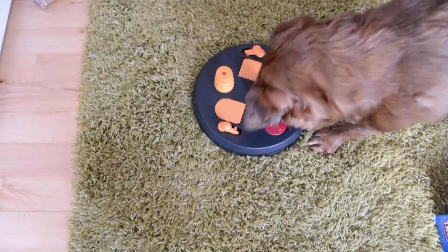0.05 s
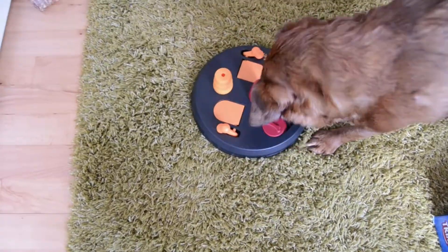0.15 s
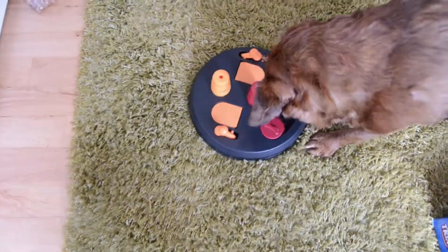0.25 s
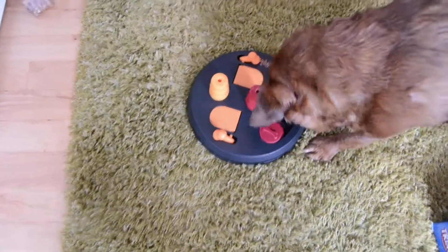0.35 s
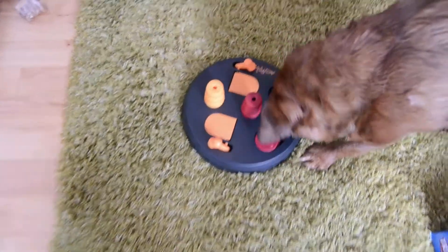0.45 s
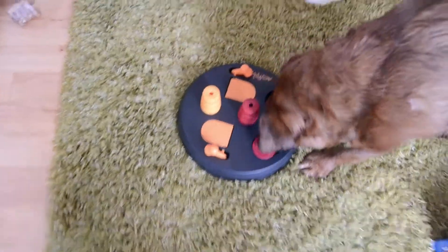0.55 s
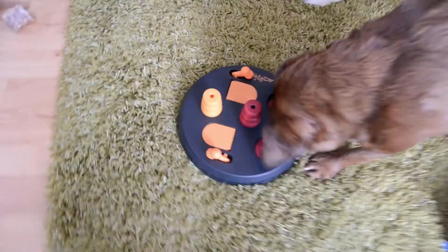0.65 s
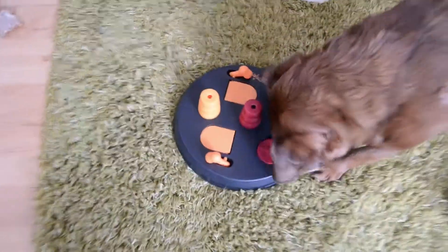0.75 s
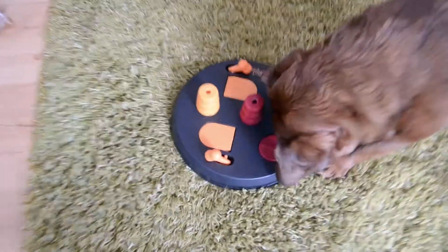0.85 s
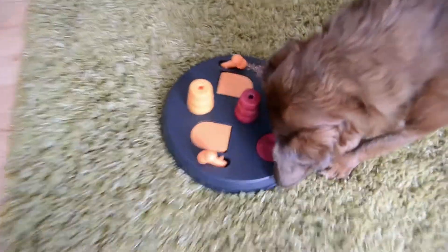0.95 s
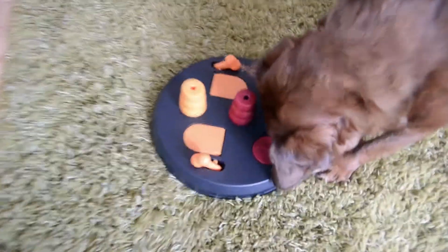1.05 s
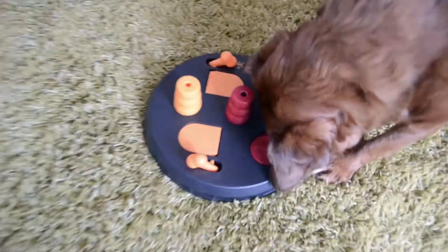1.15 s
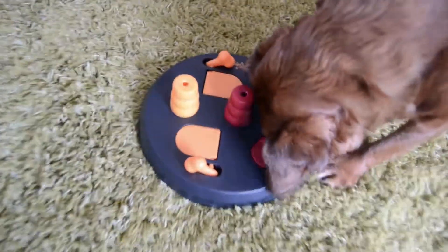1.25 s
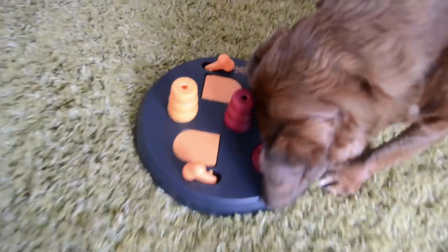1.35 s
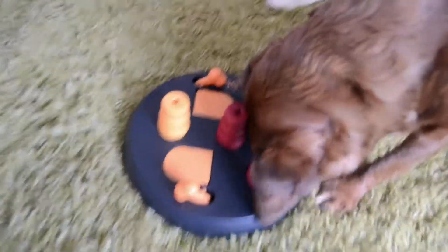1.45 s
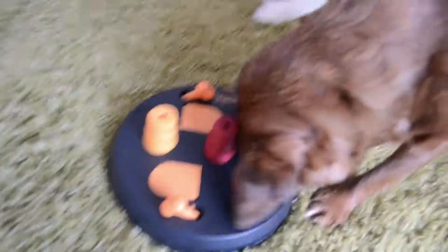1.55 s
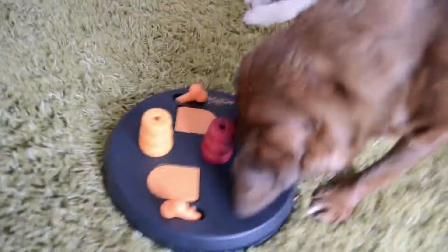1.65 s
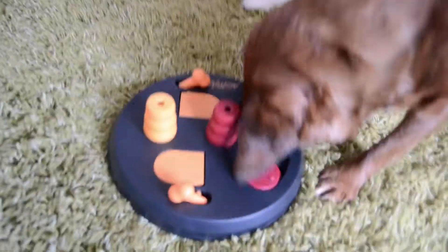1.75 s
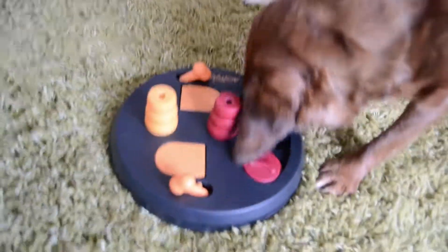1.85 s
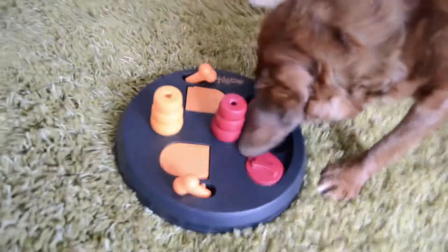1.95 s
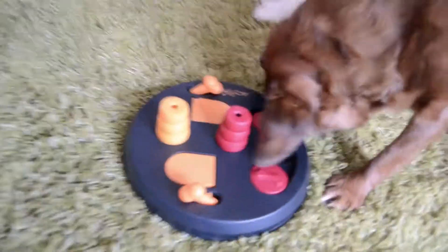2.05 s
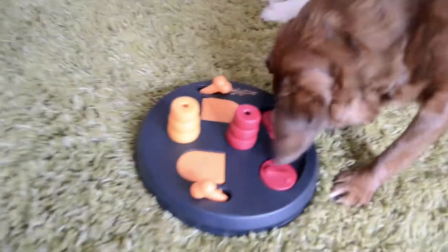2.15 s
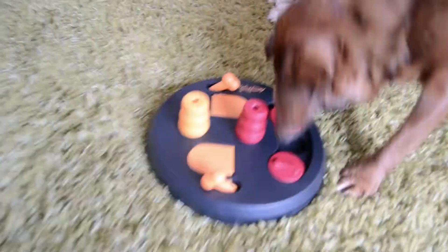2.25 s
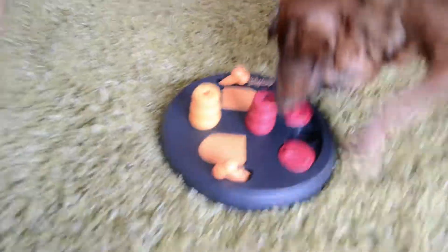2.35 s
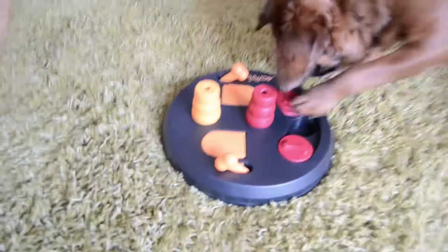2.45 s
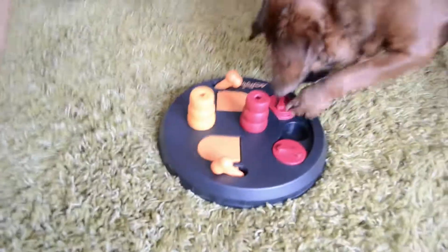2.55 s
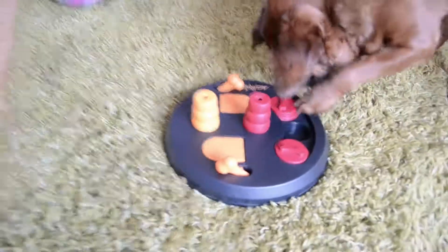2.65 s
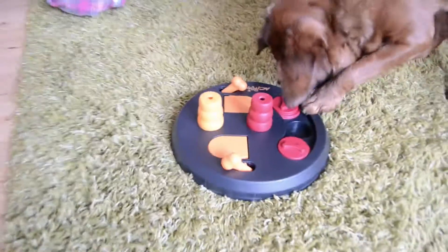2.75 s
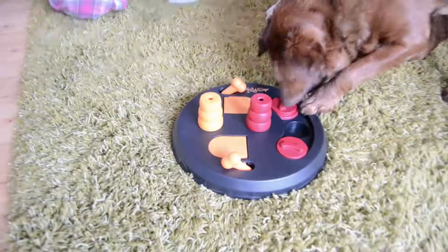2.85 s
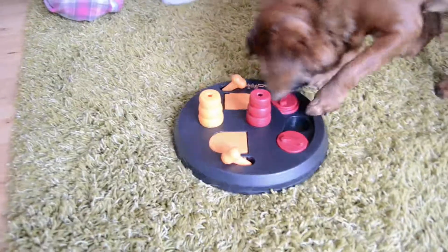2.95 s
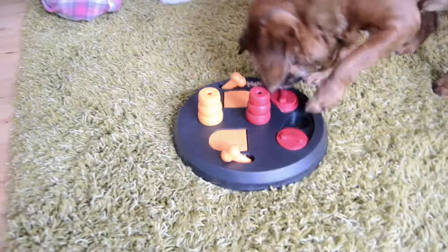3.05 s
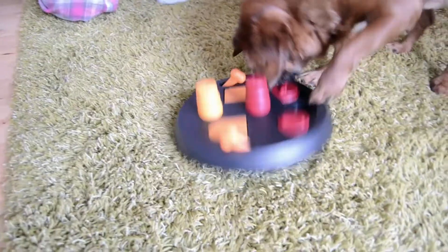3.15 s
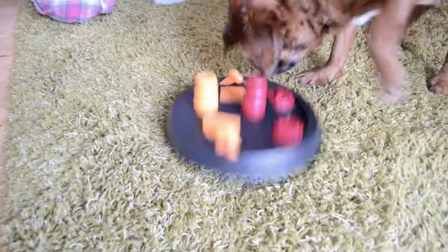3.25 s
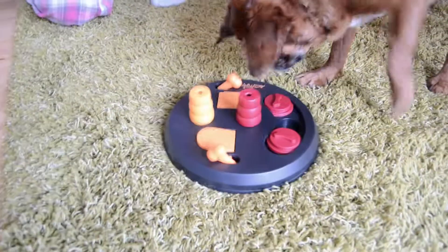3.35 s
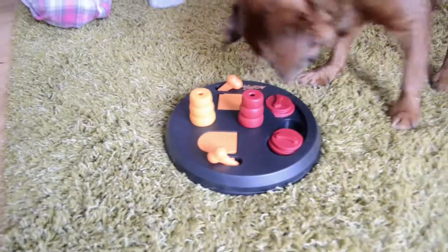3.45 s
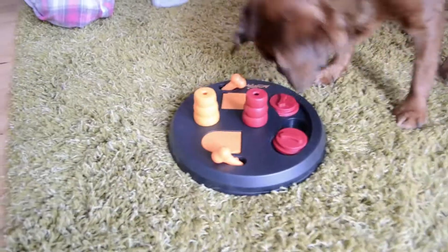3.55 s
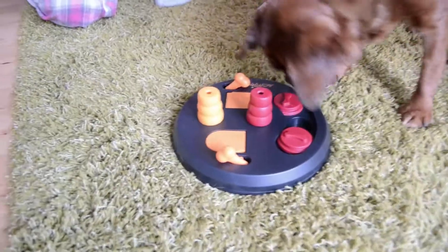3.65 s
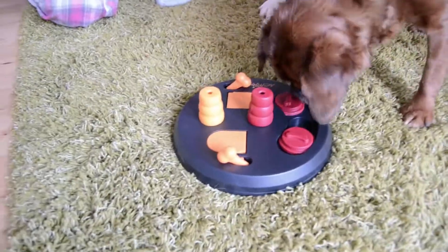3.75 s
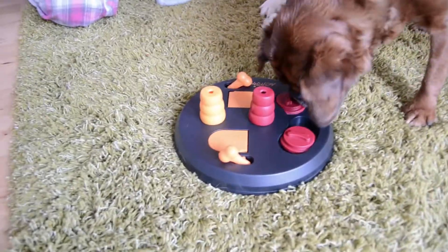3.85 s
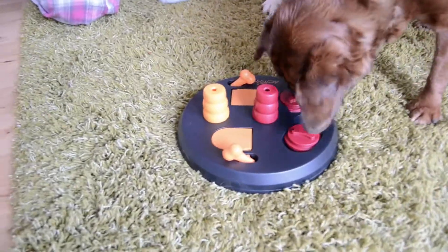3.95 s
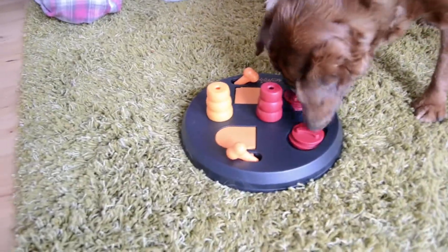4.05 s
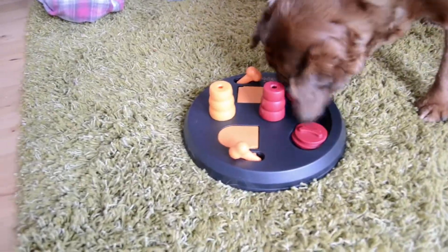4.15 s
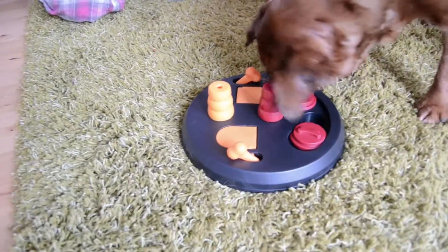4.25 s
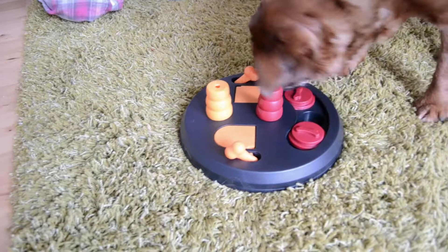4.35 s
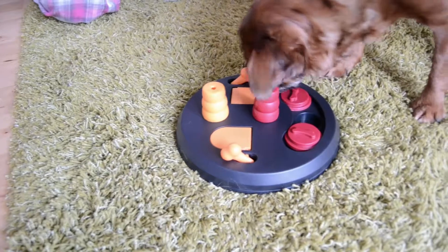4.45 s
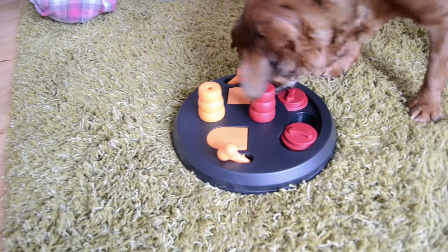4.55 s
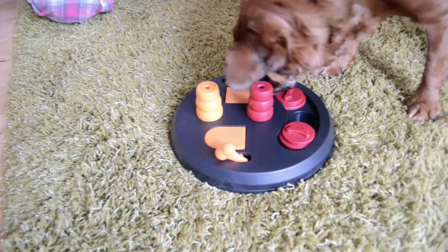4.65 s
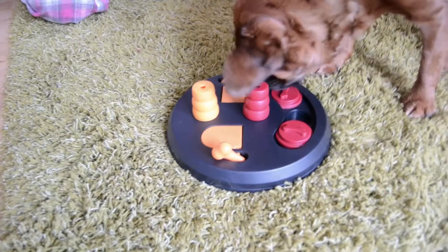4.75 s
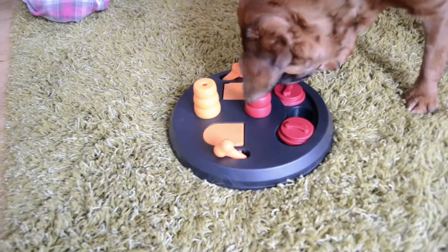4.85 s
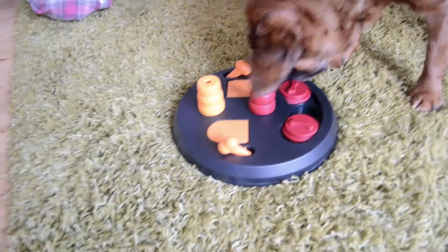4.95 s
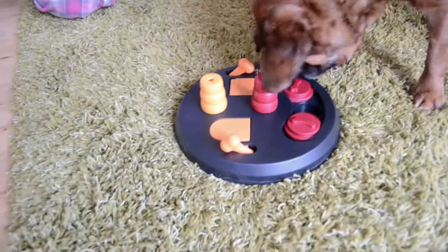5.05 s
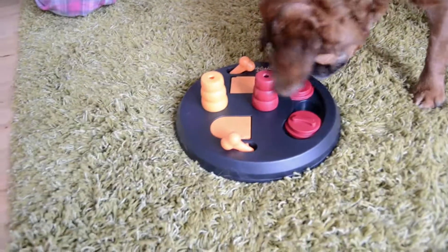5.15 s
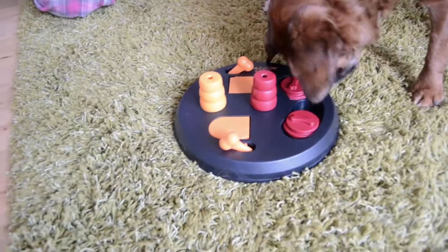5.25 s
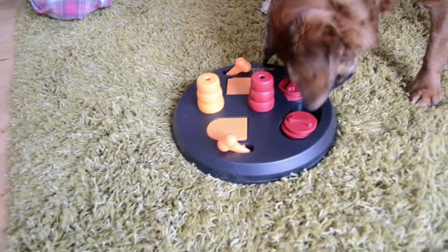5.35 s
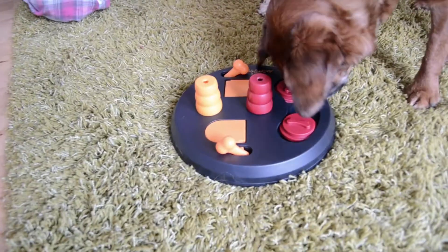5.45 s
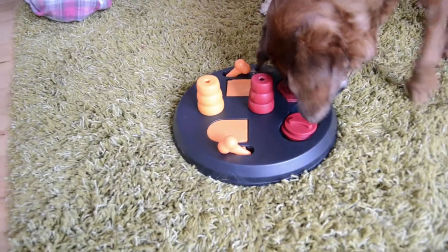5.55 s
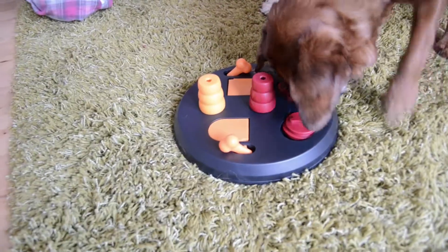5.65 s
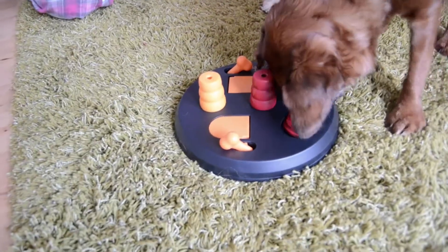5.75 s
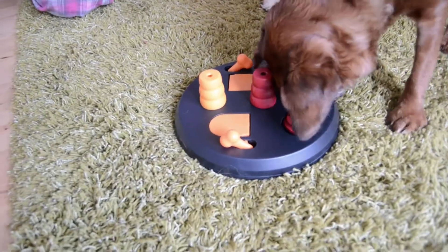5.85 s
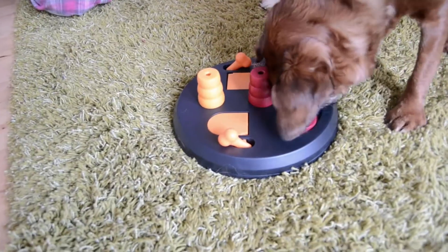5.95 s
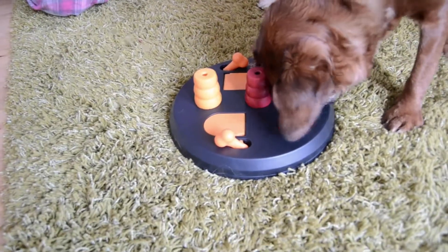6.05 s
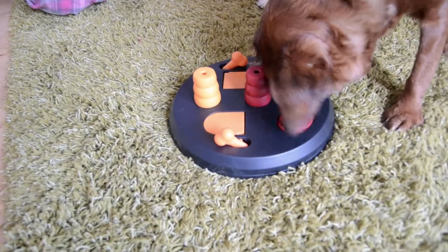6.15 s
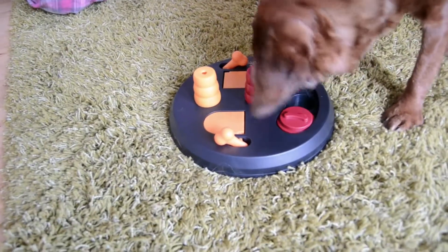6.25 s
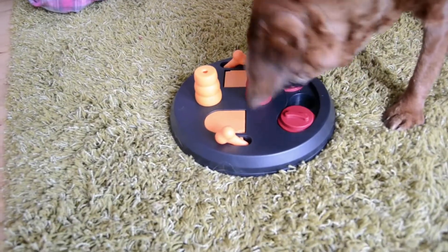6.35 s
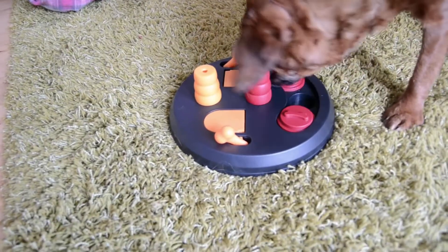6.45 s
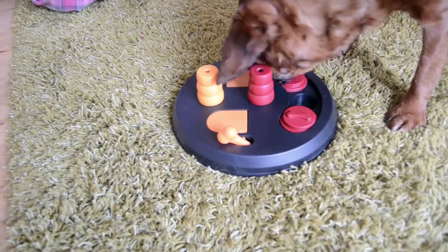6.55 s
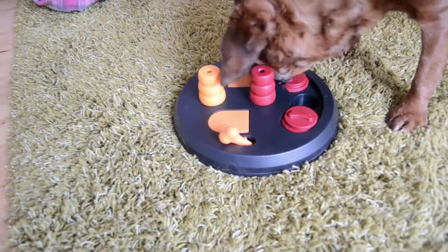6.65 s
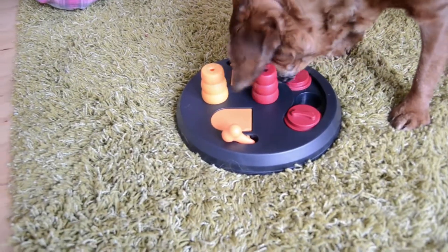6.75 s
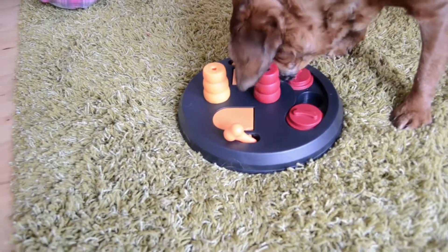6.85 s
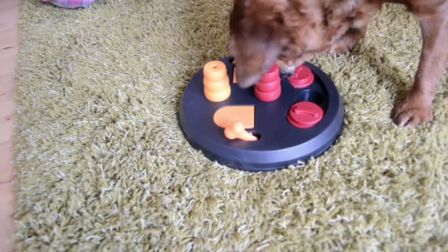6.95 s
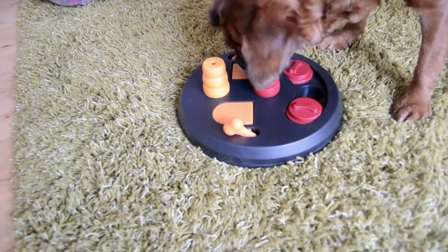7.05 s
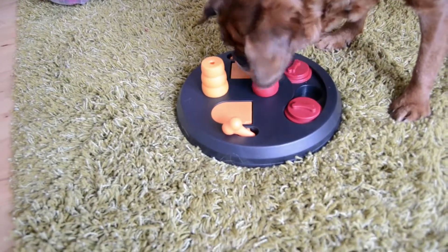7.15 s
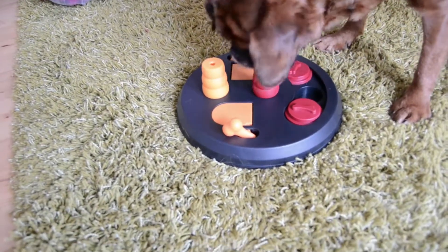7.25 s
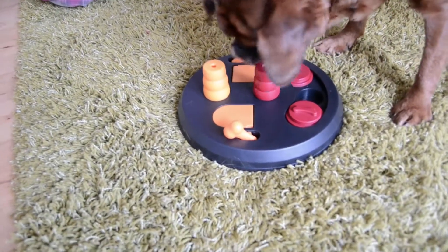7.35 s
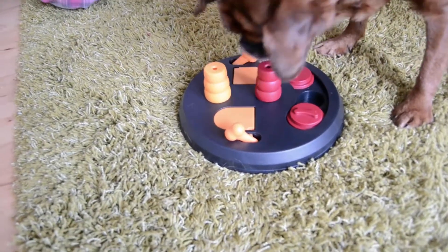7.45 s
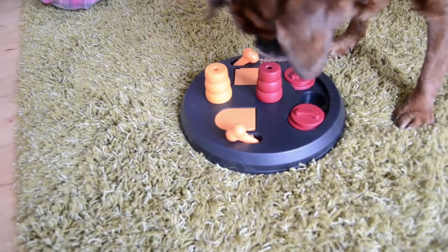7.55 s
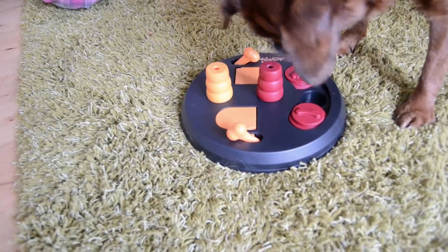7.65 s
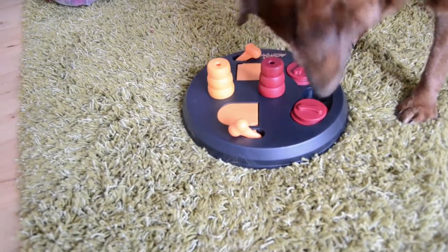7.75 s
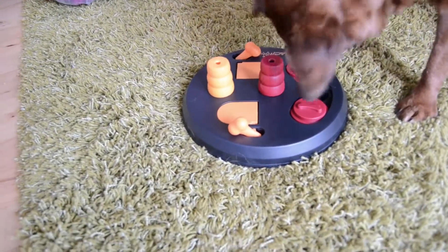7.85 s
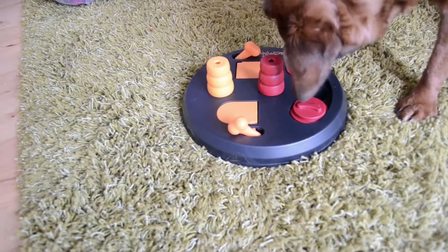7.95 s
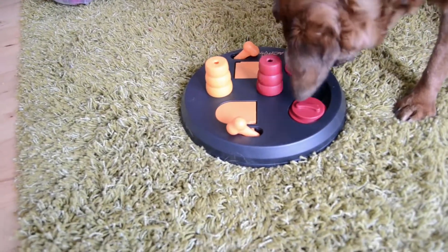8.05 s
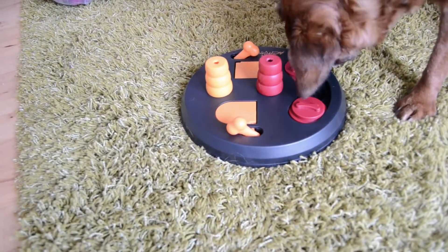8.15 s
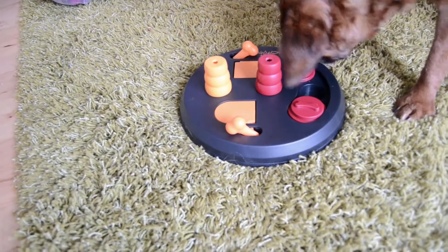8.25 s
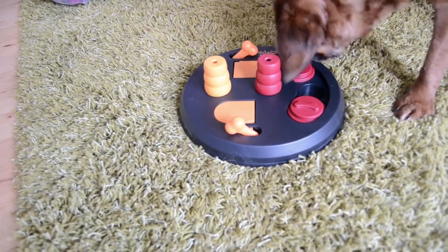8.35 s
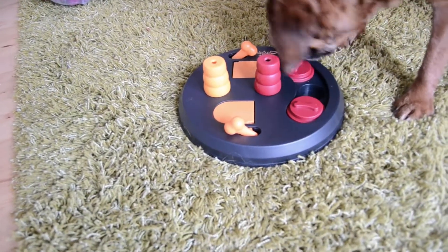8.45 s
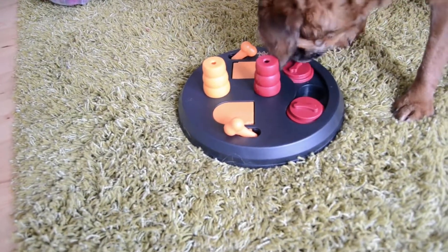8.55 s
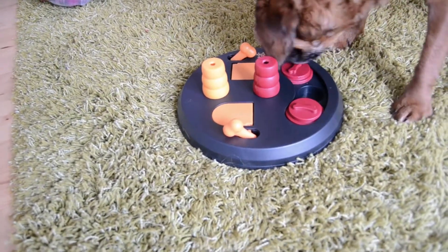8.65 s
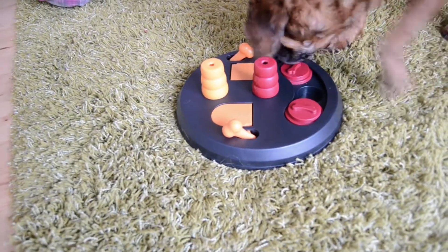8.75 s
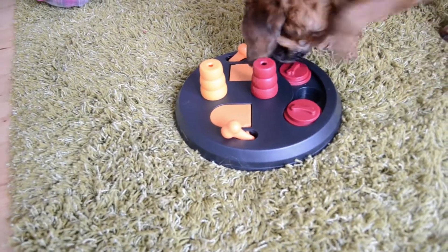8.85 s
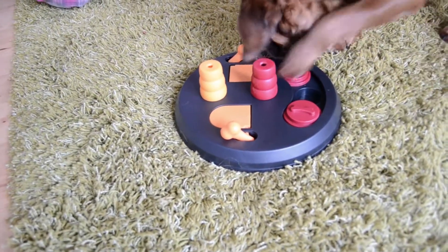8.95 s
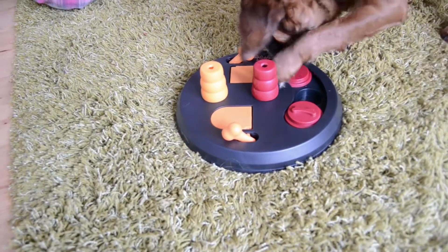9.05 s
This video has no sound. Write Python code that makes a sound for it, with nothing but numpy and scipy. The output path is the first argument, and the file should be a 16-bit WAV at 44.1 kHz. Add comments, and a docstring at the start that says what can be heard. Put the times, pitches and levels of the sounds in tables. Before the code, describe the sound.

A dog noses a hollow plastic puzzle board on carpet, pegs and lids clicking, then the board drops with a loud clatter and quiet snuffling follows.

```python
"""A dog works at a hollow plastic puzzle board on a shag carpet in a living room.
First pegs, lids and claws click on the ringing board; lids scrape, carpet and fabric hiss as they rub,
lips click, the jaw pops, the steel collar tag rings and soft steps thud as low noise.
After three seconds the tipped board falls back with a clatter, and its loose pieces rattle.
Later come small knocks, mouth pops, snuffling in breathy noise and bright lip clicks, then last taps."""
import sys
import numpy as np
from scipy import signal
from scipy.fft import rfft, irfft, next_fast_len
from scipy.io import wavfile
from scipy.ndimage import map_coordinates

SR = 44100
rng = np.random.default_rng(int(sys.argv[2]) if len(sys.argv) > 2 else 0)


def dump(signal):
    """Clip the signal to [-1, 1] and save it as 16-bit WAV at the path in sys.argv[1]."""
    limited = np.clip(np.atleast_2d(signal).T, -1, 1)
    pcm = np.round(limited * 32767).astype(np.int16)
    wavfile.write(sys.argv[1], SR, pcm)


N = 401751  # samples, about 9.1 s

# All spectra hold relative levels; the noise or blow is set to its own level afterwards.
# quiet air of the room: (frequency [Hz], level [dB per Hz])
AIR_SPECTRUM = [(15, -44.5), (28, -26), (42, -12), (54, -11), (75, -18), (141, -9), (191, -13), (370, -5.5),
                (857, -12.5), (1080, -14), (1700, -17.5), (2490, -18.5), (7440, -31.5), (8660, -32),
                (10900, -36.5), (14200, -72.5), (22000, -120)]
AIR_DB = -66
# how long the room rings: (frequency [Hz], time to fall 60 dB [s])
ROOM_DECAY = [(80, 0.42), (400, 0.37), (1500, .4), (4000, .35), (10000, 0.13)]
# borders of the four ranges called hollow, knock, clack and edge: (frequency [Hz], ...)
RANGE_BORDERS_HZ = [1100, 2200, 4500]
BLOW_S = .008  # a blow's level is its rms over this time

# fabric and carpet rubs: (time [s], length [s], soft brush level [dB], fibre hiss level [dB])
RUBS = [(-.06, 0.21, -53.5, -46), (0.283, 0.65, -67.5, -64), (1.39, 0.51, -62.5, -64.5),
        (1.755, 0.35, -49.5, -56.5), (1.988, .5, -50.5, -54.5), (2.142, 0.51, -46.2, -69),
        (2.679, 0.28, -59.5, -58), (2.91, 0.28, -57.5, -67.5), (3.493, 0.35, -63, -59),
        (3.74, 0.51, -56, -76)]
# soft brushing: (frequency [Hz], level [dB per Hz])
BRUSH_SPECTRUM = [(30, -40), (70, -16), (150, -8), (400, -2), (1100, 1), (1800, -1.5), (3000, -11),
                  (6000, -28.5), (11000, -40)]
# hissing fibres: (frequency [Hz], level [dB per Hz])
FIBRE_SPECTRUM = [(300, -22), (1500, -2.5), (3000, 3.5), (5000, -3), (7000, -5.5), (7900, -15.5),
                  (8800, -6.5), (11000, -14.5)]
RUB_LEAN, RUB_ROUND = 0.5, 1.13  # lean under 1 crests early; round shapes the swell
FLUTTER_DB, FLUTTER_PER_S = -0.46, 22  # size and pace of the random flutter in a rub
# a faint stir lies under the rubs and dies down
BRUSH_DB, BRUSH_FADE_DB_PER_S = -67.5, 0.27
FIBRE_DB, FIBRE_FADE_DB_PER_S = -68, 1.5
# soft steps and bumps: (time [s], level [dB], hardness [dB per octave])
STEPS = [(.28, -64, 5.5), (.475, -63, 6), (.56, -65, 5), (1.016, -73, 9), (1.42, -56, 2.5),
         (1.631, -57.5, 0), (1.795, -52.5, 4), (1.911, -52, 7), (2.10, -54, 0), (2.2, -65, 0),
         (2.412, -52, 8), (5.79, -70, 5), (6.82, -67, -5.5), (6.869, -66, -4), (7.548, -67.5, 8.5),
         (7.965, -65, -8), (8.65, -66, 9)]
# thud through the floor, before hardness tilts it: (frequency [Hz], level [dB per Hz])
THUD_SPECTRUM = [(20, -61), (40, -33), (58, -9), (78, 1.5), (105, -1.5), (135, -14.5), (175, -10.5),
                 (300, -20), (700, -47.5), (3000, -120)]
STEP_RISE_S, STEP_T60_S = 0.025, .42  # t60 is the time to fall 60 dB
LANDING_S, LANDING_THUD_DB = 3.4206, -51  # the tipped board falls back on the carpet

# collar tag strikes: (time [s], level that scales the tag's tones [dB])
JINGLES = [(0.098, -56), (1.303, -66.5), (4.965, -61)]
# tones of the steel tag: (frequency [Hz], relative level [dB], time to fall 60 dB [s])
TAG_TONES = [(1461, -2, .3), (4778, 0, .38), (5350, -9, .1), (6562, -12, .2), (7055, -5, .28),
             (8470, -11, .18), (8950, -8, .15)]
# sniffs over the pegs: (time [s], length [s], level [dB])
SNUFFLES = [(5.649, 0.13, -63.5), (7.238, 0.66, -57.5), (7.761, 0.099, -62.5), (8.129, 0.11, -70),
            (8.623, 0.24, -66.5)]
# breath through the nose: (frequency [Hz], level [dB per Hz])
SNOUT_SPECTRUM = [(400, -9), (900, 1.5), (1600, 3.5), (2400, -2), (3800, -8), (5400, -5.5), (6600, -10.5),
                  (8000, -14.5), (9500, -14), (11000, -17)]
# wet lip clicks: (time [s], peak level before the room [dB], pitch [Hz])
SMACKS = [(0.2824, -49, 8800), (0.7342, -39, 10050), (6.8963, -42.5, 8900), (7.392, -33, 8900),
          (7.4096, -23.5, 8800), (7.4156, -28, 8600), (7.421, -29.5, 9100), (7.4377, -43, 8860),
          (7.600, -47, 9800)]
# jaw and muzzle pops: (time [s], level [dB], brightness [dB])
CHEWS = [(1.015, -60.5, -3), (4.327, -62, 5), (5.786, -61, 1), (6.041, -51.5, 2), (6.209, -60.5, -3),
         (6.339, -70.5, -8), (6.770, -60, -2), (7.026, -63, -1.5), (7.494, -60, -1), (8.118, -60.5, 2),
         (8.616, -63, -2.5), (8.752, -65.5, -3)]
# mouth cavity: (frequency [Hz], level [dB per Hz])
MOUTH_SPECTRUM = [(60, -40), (250, -3.5), (450, 4.5), (750, 11.5), (1200, -9), (2000, -14.5), (2600, -7),
                  (3300, -28), (5000, -9), (10000, -15)]
# mouth pop, added to its level: (hollow [dB], knock [dB], clack [dB], edge [dB])
CHEW_BALANCE_DB = (4, 5.5, -8, -17)
# lids sliding in their grooves: (time [s], length [s], level [dB])
SCRAPES = [(0.0, 0.043, -39), (0.054, 0.095, -55), (1.238, 0.042, -39), (2.495, 0.026, -37),
           (2.616, 0.12, -43), (3.015, 0.073, -48.5), (6.869, 0.062, -60)]
# rub of a lid in its groove: (frequency [Hz], level [dB per Hz])
GROOVE_SPECTRUM = [(200, -23.5), (800, -9.5), (1600, 2.5), (2700, 6), (4200, 2.5), (5700, -1), (7800, -5.5),
                   (9500, -9), (11000, -14)]

# plastic knocks: (time [s], what is struck, level before LIFT_DB [dB], extra thump [dB],
# extra brightness [dB], contact time before SOFTNESS [s], number of rebounds)
KNOCKS = [(0.0028, "board", -44.5, -2.5, 3, .0026, 0), (0.0235, "board", -42.5, -15, -4, .0028, 0),
          (0.0761, "peg", -44.5, -9, 7, .0013, 0), (0.0957, "claw", -55.5, -4, 1.5, .0019, 0),
          (0.166, "peg", -49, 0, 7.5, .0008, 0), (0.323, "lid", -59, -15, -1, .001, 0),
          (0.3288, "board", -48.5, -13, 1, .001, 0), (0.421, "claw", -71.5, -2, -7, .0006, 0),
          (0.447, "lid", -62.5, -5, -1.5, .0008, 0), (0.4866, "lid", -59.5, 8, 3, .0003, 0),
          (0.5766, "lid", -68.5, 18, -2, .0006, 0), (1.0543, "peg", -44.5, 4, 3, 0.00042, 0),
          (1.0705, "board", -53.5, 13.5, 13.5, .0021, 0), (1.0752, "peg", -33.5, 2.5, 1.5, .001, 0),
          (1.15, "peg", -49.5, 6, -4, .0005, 0), (1.282, "peg", -32.5, -4.5, -18, .0016, 2),
          (1.302, "peg", -29, -0.5, -5, .0006, 0), (1.813, "board", -52, -9, 4.5, .0011, 0),
          (2.4883, "claw", -51, -12, 5, .0012, 0), (2.5513, "peg", -25.5, -6.5, 5, .0024, 0),
          (2.5619, "peg", -29.5, -1, 5.5, .0012, 1), (2.5963, "board", -41, 5, 9, .0009, 0),
          (2.6619, "claw", -46.5, -5, -5, .001, 0), (2.6765, "lid", -48.5, 0.5, 6.5, .002, 0),
          (2.6797, "claw", -45.5, 3, 2.5, .0009, 0), (2.6859, "lid", -49.5, 0, 2.5, .0013, 0),
          (2.8667, "lid", -62.5, 4, 0.5, .0031, 0), (3.215, "board", -39, 1, -9.5, .0018, 1),
          (3.226, "board", -34, -5, -8.5, .0022, 0), (3.2522, "lid", -52.5, 7.5, -5, .0015, 0),
          (3.2663, "lid", -36.5, 4, -7, .0009, 0), (3.282, "board", -43, -2.5, -4, .0013, 0),
          (3.3446, "board", -38.5, 3, 1.5, .0018, 0), (3.3514, "socket", -35.5, -4.5, -3, .0013, 0),
          (3.3663, "board", -36.5, 4, 1, .0013, 0), (3.3962, "peg", -39.5, -4.5, 1.5, .0008, 0),
          (3.404, "board", -31.5, -0.5, -3.5, .003, 0), (3.41, "board", -28, -2, 0.5, .0017, 0),
          (3.4205, "board", -11, -5.5, 0.5, .001, 0), (3.426, "board", -21, -8, -1, .0012, 0),
          (3.4906, "board", -26.5, -1, 3.5, 0.0015, 0), (4.9505, "board", -41, 0.5, 2.5, .0018, 0),
          (4.963, "board", -40, -1, -12, .0028, 1), (6.473, "lid", -60, 11, -8, .0005, 0),
          (7.5508, "socket", -32, 0, -2, .0006, 0), (7.5563, "claw", -54.5, 13, -10, .002, 0),
          (9.0888, "claw", -43.5, 9.5, -1.5, .001, 0), (9.1023, "lid", -50, -2.5, -2.5, .0009, 0)]
# struck things by name: (resonance [Hz], its prominence [dB], then relative to the knock range:
# hollow [dB], clack [dB], edge [dB]; room level relative to the blow [dB])
PIECES = {"peg": (1520, 5.5, -8, -12, -11.5, -11.5), "lid": (2620, 8.5, -4.5, 11.5, 1, -10),
          "board": (1859.5, 3.5, -3, -3.5, -8, -6), "claw": (6198, -1.5, -6, 5.5, 15, -7),
          "socket": (950, 3, 2.5, -4.5, -12.5, -8.5)}
# ringing tones of the hollow board and pegs, before random scatter of the levels:
# (frequency [Hz], relative level [dB], time for the free ring to fall 60 dB [s])
BOARD_TONES = [(583, -10.5, .16), (672, -8, 0.11), (712, -5.5, .22), (738, -6.5, 0.42), (907, -7, .18),
               (937, -7, 0.2), (1070, -6, .2), (1170, -7.5, 0.28), (1445, -1.5, 0.19), (1580, -3, .17),
               (1660, -2, 0.16), (1785, -1.5, .17), (1946, -3.5, .18), (2310, -4.5, .18), (2560, -2, 0.21),
               (2760, -4, .2), (2970, -3, .17), (3275, -3.5, .15), (4068, -7, .12), (4750, -4.5, .17),
               (6160, -8, .09), (8200, -8.5, .07)]
# crack of plastic on plastic: (frequency [Hz], level [dB per Hz])
CRACK_SPECTRUM = [(30, -48.5), (150, -33.5), (300, -21), (430, -14.5), (560, -1.5), (950, -1.5), (1700, 1),
                  (3000, -8), (5000, -8.5), (7500, -12.5), (9500, -13.5), (11000, -24.5)]
LIFT_DB, SOFTNESS = 0.81, .85  # raises every contact; shortens the push of every contact
RING_DB, DAMPED_S = -1, .02  # ring relative to crack; time for the damped ring to fall 60 dB
FREE_DB = -29  # the part of the ring that the carpet leaves undamped
PIECE_WIDTH = .11  # half-width of a piece's resonance as a share of its pitch
FLIGHT_S, REBOUND_LOSS_DB = .0062, 2.5  # time between bounces, loss at each
# the loose pieces rattle after the fall, ever weaker and duller
RATTLE_S, RATTLE_PER_S = .088, 90
RATTLE_DB, RATTLE_FADE_DB_PER_S, RATTLE_DULLS_DB_PER_S = -27.5, 40, 80  # level before LIFT_DB
RATTLE_SCATTER_DB, RATTLE_PEAK_DB, RATTLE_WET_DB = 3, 6, -8
RATTLE_CONTACT_S = 0.0018  # before SOFTNESS
# rattle, added to its level: (hollow [dB], knock [dB], clack [dB], edge [dB])
RATTLE_BALANCE_DB = (-3.5, 0.5, -1.5, -5.5)
# resonances of the rattling pieces: (lowest [Hz], highest [Hz])
RATTLE_HZ = (706, 3500)
TOP_HZ = 11000  # upper limit of the sound


def amp(db):
    """Turn decibels into a gain."""
    return 10 ** (np.asarray(db) / 20)


def unit(x):
    """Scale to rms 1."""
    return x / np.sqrt(np.mean(x ** 2) + 1e-20)


def along(points, hz):
    """Read values between (frequency, value) points on a log frequency axis."""
    f, v = np.transpose(points)
    return np.interp(np.log(hz + 1), np.log(f + 1), v)


def coloured(x, gain_db):
    """Filter with a gain in dB for each frequency, never sounding ahead of its cause."""
    size = next_fast_len(len(x) + 4096)
    log_gain = np.log(amp(gain_db(np.fft.rfftfreq(size, 1 / SR))) + 1e-6)
    # folding the cepstrum onto positive times gives a minimum-phase filter
    cepstrum = irfft(log_gain, size)
    cepstrum[1:size // 2] *= 2
    cepstrum[size // 2 + 1:] = 0
    return irfft(rfft(x, size) * np.exp(rfft(cepstrum)), size)[:len(x)]


def noise(spectrum, size, grain_db=0):
    """Make noise of rms 1; grain_db makes it catch and slip from millisecond to millisecond."""
    grip = np.repeat(rng.standard_normal(size // 32 + 1), 32)[:size]
    rough = rng.standard_normal(size) * amp(grain_db * grip)
    return unit(coloured(rough, lambda hz: along(spectrum, hz)))


def stroke(length, db, spectrum, grain_db, lean):
    """Rubbing or breathing: noise that swells and fades; lean under 1 puts its crest early."""
    size = int(length * SR)
    swell = np.sin(np.pi * np.linspace(0, 1, size) ** lean) ** 2
    return amp(db) * swell * noise(spectrum, size, grain_db)


def add(track, s, sound):
    """Mix a sound into a track at time s, or at the start if s is negative."""
    part = track[max(round(s * SR), 0):][:len(sound)]
    part += sound[:len(part)]


def in_room(x, wet_db, build=0.00067):
    """Add the room's echo: random noise that builds up fast and fades at its own pace per pitch."""
    hz, t, z = signal.stft(rng.standard_normal(SR // 2), SR, nperseg=256)
    fade = amp(-60 * t / along(ROOM_DECAY, hz)[:, None]) * (1 - np.exp(-t / build))
    tail = signal.istft(z * fade, SR, nperseg=256)[1]
    response = amp(wet_db) * tail / np.linalg.norm(tail)
    response[0] += 1  # the direct sound
    return signal.fftconvolve(x, response)


def range_shares(f):
    """Split each frequency smoothly among the four ranges."""
    below = [1 / (1 + (f / edge) ** 8) for edge in RANGE_BORDERS_HZ]
    return np.diff([0 * f] + below + [0 * f + 1], axis=0)


def balanced(x, levels_db):
    """Where and how hard a thing is struck sets the energy in each of its four ranges."""
    power, hz = np.abs(rfft(x)) ** 2, np.fft.rfftfreq(len(x), 1 / SR)
    present_db = 10 * np.log10(range_shares(hz) @ power * 2 / (len(x) * BLOW_S * SR))
    change_db = np.array(levels_db) - present_db
    return coloured(x, lambda f: change_db @ range_shares(f))


def contact(t, duration, chatter, chatter_db, hard_s=0.00099):
    """Force of a blow: a rough push, loose parts buzzing to rest, and a snap that is stronger when short."""
    duration = max(duration, .0001)
    u = t / duration
    push = unit(rng.standard_normal(len(t)) * u * np.exp(-u))
    buzz = unit(rng.standard_normal(len(t)) * amp(-60 * t / max(chatter, .002)))
    snap = unit(signal.unit_impulse(len(t), round(duration * SR)))
    return push + amp(chatter_db) * buzz + min((hard_s / duration) ** 2, 2) * snap


def room_air():
    """The quiet air of the room is a steady noise, strongest in the lows."""
    return amp(AIR_DB) * noise(AIR_SPECTRUM, N)


def rubbing():
    """Fabric and carpet pile rub in swells that flutter as the pressure shifts, over a fading stir."""
    t = np.arange(N) / SR
    # powers are added, so overlapping rubs do not double in level
    brush = amp(BRUSH_DB - BRUSH_FADE_DB_PER_S * t) ** 2
    fibre = amp(FIBRE_DB - FIBRE_FADE_DB_PER_S * t) ** 2
    for s, length, brush_db, fibre_db in RUBS:
        # a rub with a negative time is already under way at the start
        u = np.arange(round(max(-s, 0) * SR), round(length * SR)) / (length * SR)
        knots = rng.standard_normal(round(length * FLUTTER_PER_S) + 4)
        flutter = amp(FLUTTER_DB * map_coordinates(knots, [u * length * FLUTTER_PER_S]))
        swell = flutter * np.abs(np.sin(np.pi * u ** RUB_LEAN)) ** RUB_ROUND
        add(brush, s, (amp(brush_db) * swell) ** 2)
        add(fibre, s, (amp(fibre_db) * swell) ** 2)
    soft = np.sqrt(brush) * noise(BRUSH_SPECTRUM, N, grain_db=1.5)
    hiss = np.sqrt(fibre) * noise(FIBRE_SPECTRUM, N, grain_db=2.5)
    return soft + hiss


def thuds():
    """Steps and the falling board push on the floor, which answers with low noise that swells and dies."""
    out, age = np.zeros(N), np.arange(SR // 2) / SR
    fade = amp(-60 * np.maximum(age - STEP_RISE_S, 0) / STEP_T60_S)
    weight = np.minimum(age / STEP_RISE_S, 1) * fade
    landing = (LANDING_S - STEP_RISE_S, LANDING_THUD_DB, 0)  # crests as the board lands
    for s, db, hardness in STEPS + [landing]:
        spectrum = [(hz, level + hardness * np.log2(hz)) for hz, level in THUD_SPECTRUM]
        add(out, s, amp(db) * weight * noise(spectrum, len(age)))
    return out


def collar():
    """The steel tag swings against the board and rings on in several pure tones."""
    out, t = np.zeros(N), np.arange(SR // 2) / SR
    for s, db in JINGLES:
        ring = np.zeros(len(t))
        for hz, level, t60 in TAG_TONES:
            ring += amp(level - 60 * t / t60) * np.sin(2 * np.pi * (hz * t + rng.random()))
        first_swing = 1 + 3 * amp(-60 * t / 0.11)  # fur damps the strong first swing
        add(out, s, in_room(amp(db) * ring * first_swing, wet_db=-1.0))
    return out


def snuffling():
    """Air rushing through the dog's nose hisses faintly as it searches over the pegs."""
    out = np.zeros(N)
    for s, length, db in SNUFFLES:
        add(out, s, stroke(length, db, SNOUT_SPECTRUM, grain_db=0.5, lean=0.42))
    return out


def lips(width_hz=1600):
    """Films of saliva snap with tiny bright clicks, each around its own pitch."""
    out, t = np.zeros(N), np.arange(SR // 40) / SR
    for s, db, pitch in SMACKS:
        force = contact(t, duration=0.00045, chatter=0.0067, chatter_db=17.5)
        snap = coloured(force, lambda hz: -16 * np.log10(1 + ((hz - pitch) / width_hz) ** 2))
        add(out, s, amp(db) * snap / np.abs(snap).max())
    return in_room(out, wet_db=-12.0)[:N]


def chewing():
    """The jaw closes with dull pops that the mouth cavity colours."""
    out, t = np.zeros(N), np.arange(SR // 10) / SR
    for s, db, bright_db in CHEWS:
        levels_db = db + np.array(CHEW_BALANCE_DB) + bright_db * np.array([-1, 0, 1, 1])
        force = contact(t, duration=0.0025, chatter=0.089, chatter_db=0)
        pop = coloured(force, lambda hz: along(MOUTH_SPECTRUM, hz))
        add(out, s, in_room(balanced(pop, levels_db), wet_db=-8.5))
    return out


def scrapes():
    """Lids stick and slip along their grooves, which makes a grainy noise."""
    out = np.zeros(N)
    for s, length, db in SCRAPES:
        add(out, s, stroke(length, db, GROOVE_SPECTRUM, grain_db=2.0, lean=.55))
    return in_room(out, wet_db=-10.0)[:N]


def knocks():
    """List each knock and its ever weaker rebounds: (time, four levels, contact, pitch, peak, room)."""
    rows = []
    for s, piece, db, thump_db, bright_db, duration, rebounds in KNOCKS:
        pitch, peak_db, hollow_db, clack_db, edge_db, wet_db = PIECES[piece]
        levels_db = db + np.array([hollow_db + thump_db, 0, clack_db + bright_db, edge_db + bright_db])
        for k in range(round(rebounds) + 1):
            rows.append((s + k * FLIGHT_S, levels_db - k * REBOUND_LOSS_DB, duration, pitch, peak_db, wet_db))
    return rows


def rattle():
    """List the loose pieces' touches after the fall, random in timing, force and pitch, as in knocks()."""
    rows = []
    count = round(RATTLE_S * RATTLE_PER_S)
    for k, (late, force, size) in enumerate(rng.uniform(-1, 1, (count, 3))):
        age = (k + 1 + late / 2) / RATTLE_PER_S
        db = RATTLE_DB - RATTLE_FADE_DB_PER_S * age + RATTLE_SCATTER_DB * force
        dulling_db = RATTLE_DULLS_DB_PER_S * age * np.array([-.5, 0, 0.62, 0.98])
        levels_db = db + np.array(RATTLE_BALANCE_DB) - dulling_db
        pitch = RATTLE_HZ[0] * (RATTLE_HZ[1] / RATTLE_HZ[0]) ** ((size + 1) / 2)
        rows.append((LANDING_S + age, levels_db, RATTLE_CONTACT_S, pitch, RATTLE_PEAK_DB, RATTLE_WET_DB))
    return rows


def puzzle():
    """Each contact cracks and rings the board; carpet and muzzle damp most of the ring at once."""
    out, t = np.zeros(N), np.arange(SR // 3) / SR
    hz, level, t60 = np.transpose(BOARD_TONES)[:, :, None]
    fade = amp(-60 * t / DAMPED_S) + amp(FREE_DB - 60 * t / t60)
    for s, levels_db, duration, pitch, peak_db, wet_db in knocks() + rattle():
        strength = amp(level + 2 * rng.standard_normal(hz.shape))
        tones = np.sin(2 * np.pi * (hz * t + rng.random(hz.shape)))
        ring = np.sum(strength * fade * tones, axis=0)
        ring *= 1 - np.exp(-t / max(duration, .0002))  # a longer contact starts the ring more gently
        force = contact(t, SOFTNESS * duration, chatter=0.051, chatter_db=-5.5)
        crack = coloured(force, lambda f: along(CRACK_SPECTRUM, f))
        blow = unit(crack) + amp(RING_DB) * unit(ring)
        # the struck piece adds one broad resonance of its own
        blow = coloured(blow, lambda f: peak_db / (1 + ((f / pitch - 1) / PIECE_WIDTH) ** 2))
        add(out, s, in_room(amp(LIFT_DB) * balanced(blow, levels_db), wet_db))
    return out


def scene():
    """Sum all sources, from the room's quiet air to the puzzle board."""
    background = room_air() + rubbing() + thuds()
    dog = collar() + snuffling() + lips() + chewing()
    return (background + dog + scrapes() + puzzle())[None]


def record(dry):
    """The treble is dulled, loud peaks are flattened and next to nothing is left above TOP_HZ."""
    heard = coloured(dry[0], lambda hz: along([(9500, -0.5), (10300, -4.5), (11000, -17.0)], hz))
    clipped = np.clip(heard, -.68, .68)
    band_limit = signal.ellip(8, .05, 50, TOP_HZ, fs=SR, output="sos")
    return signal.sosfiltfilt(band_limit, clipped)[None]


dry = scene()
out = record(dry)
dump(out)
```